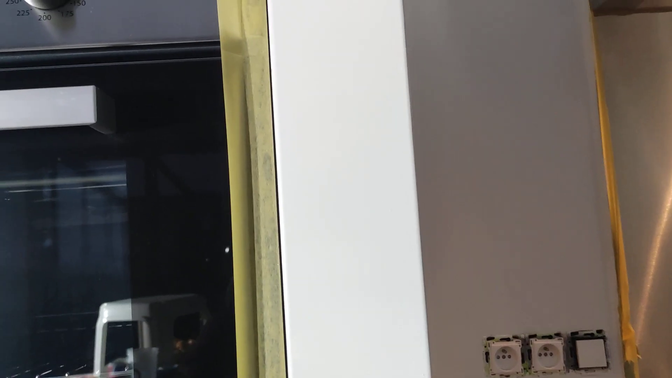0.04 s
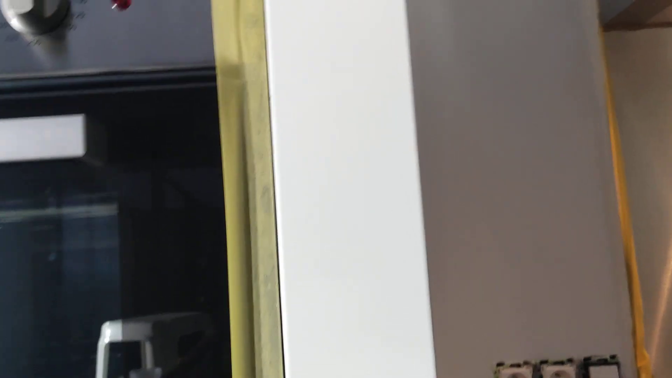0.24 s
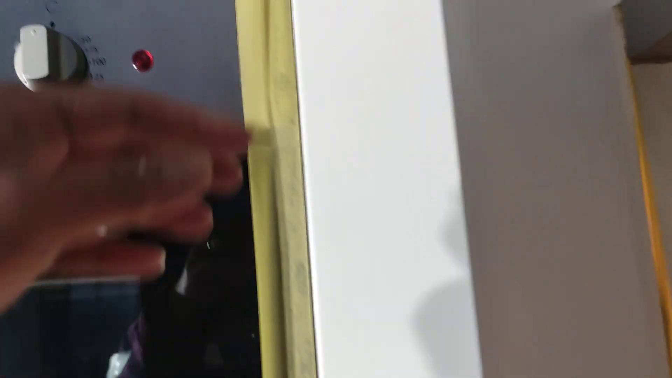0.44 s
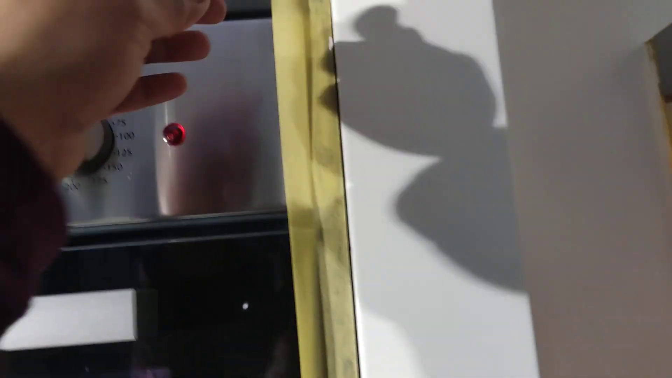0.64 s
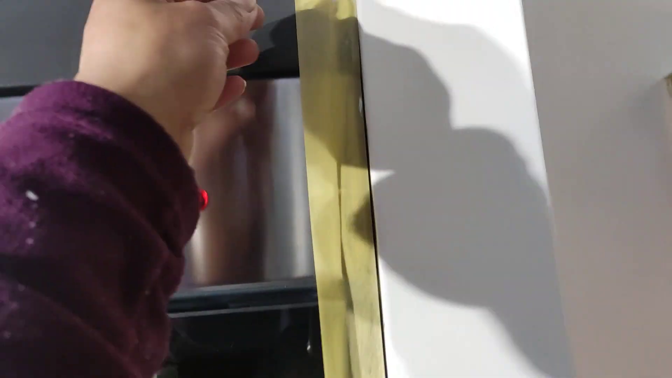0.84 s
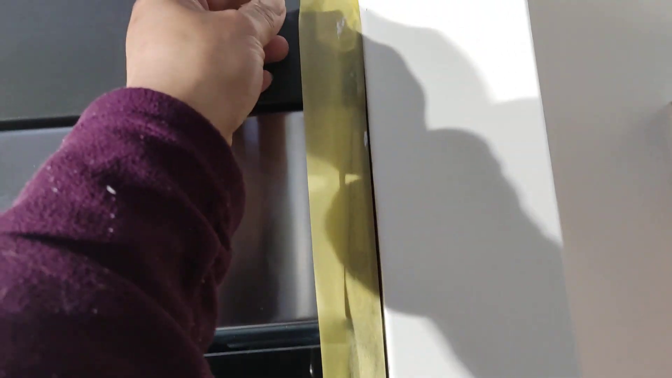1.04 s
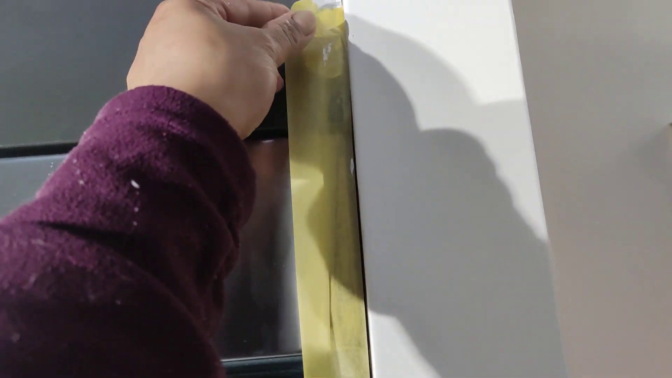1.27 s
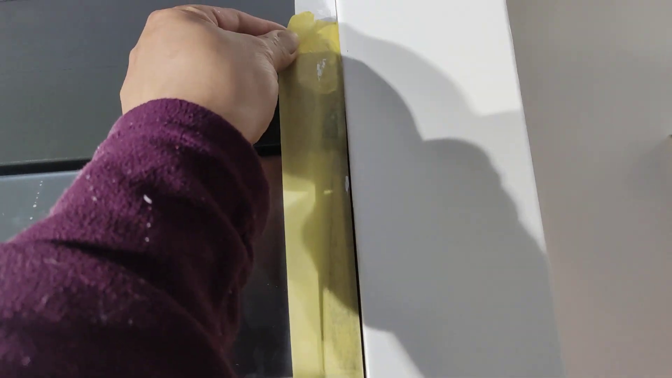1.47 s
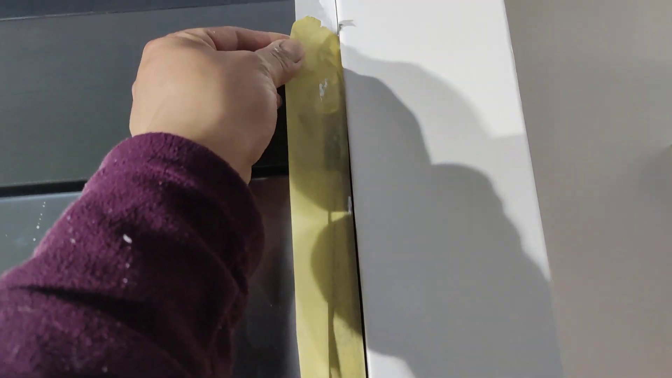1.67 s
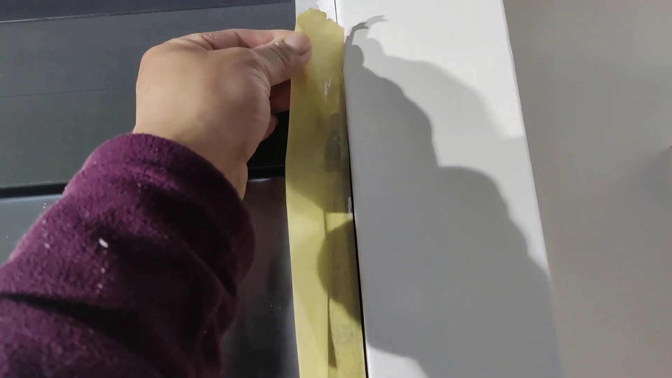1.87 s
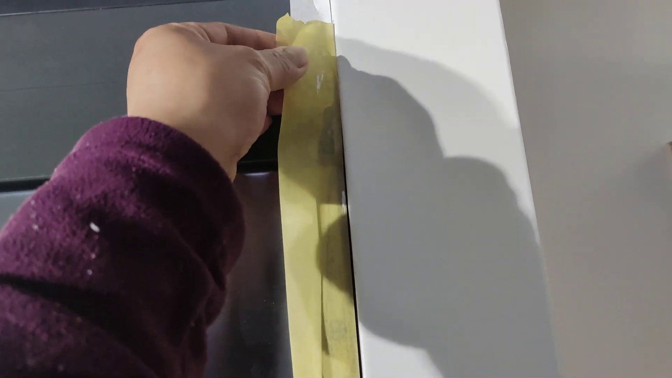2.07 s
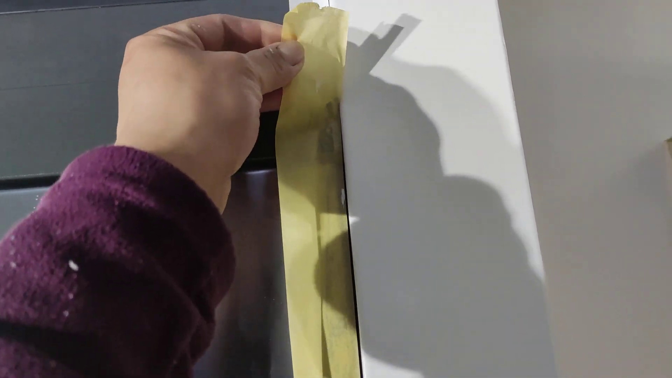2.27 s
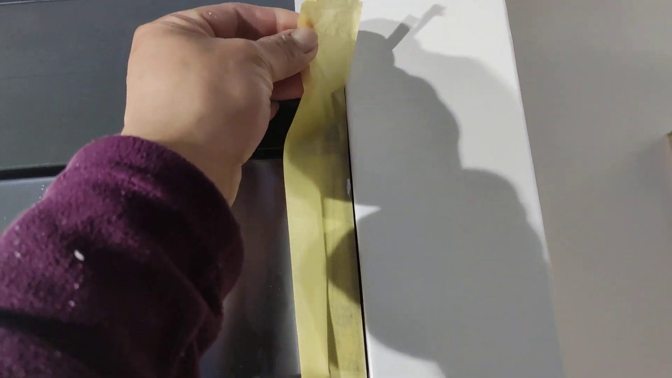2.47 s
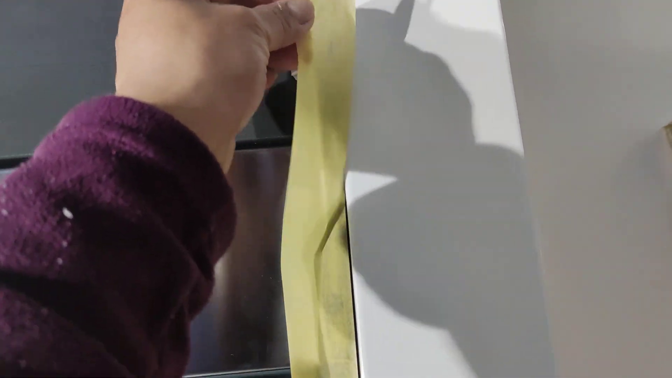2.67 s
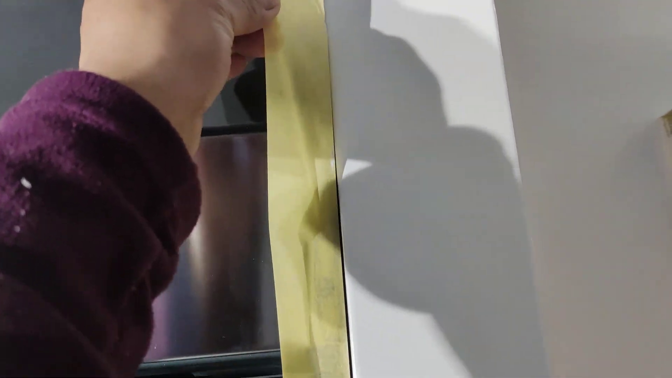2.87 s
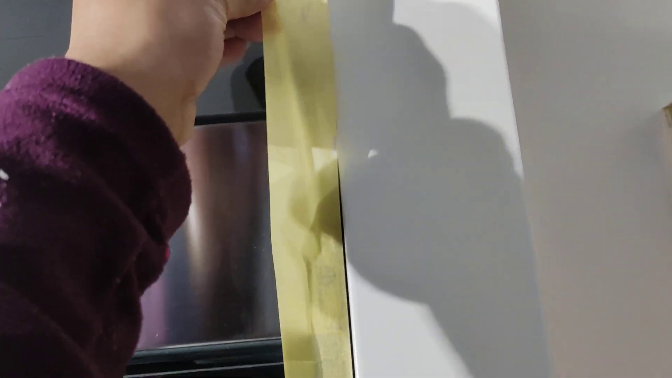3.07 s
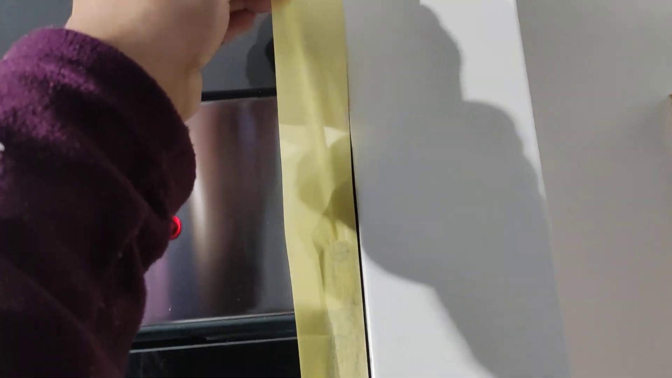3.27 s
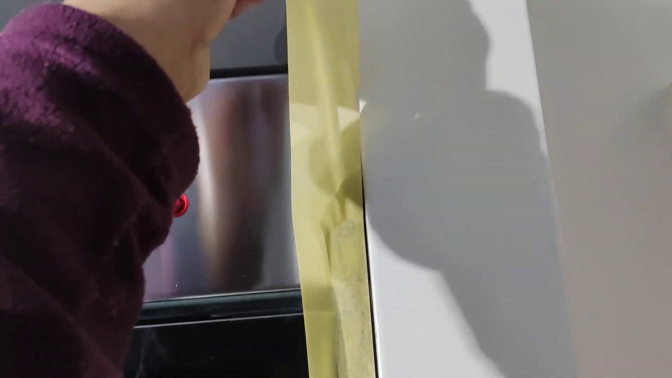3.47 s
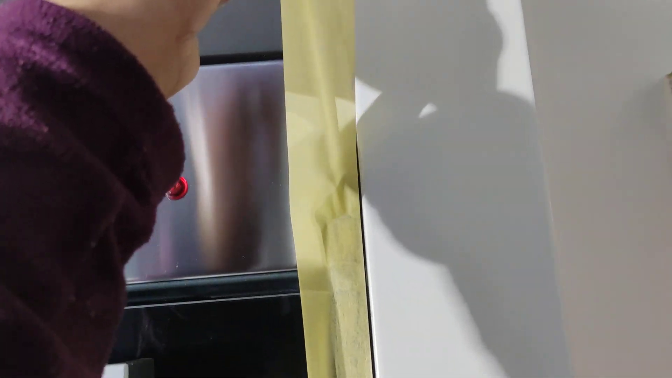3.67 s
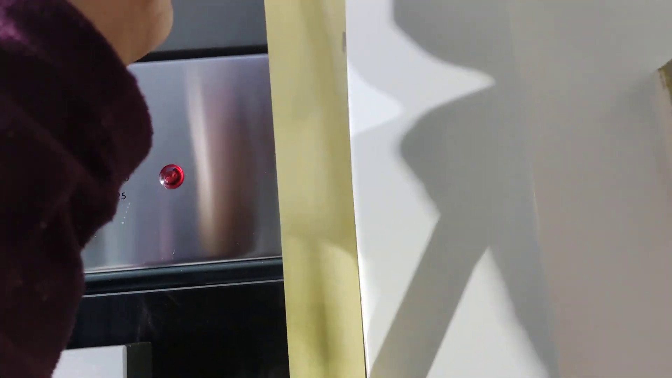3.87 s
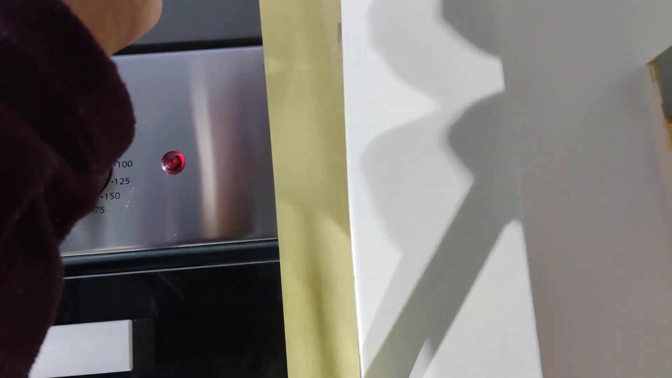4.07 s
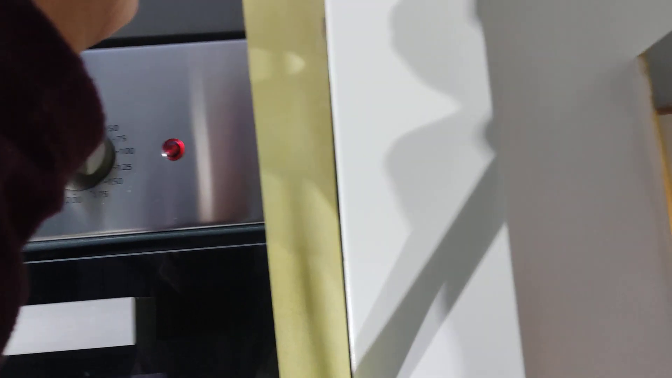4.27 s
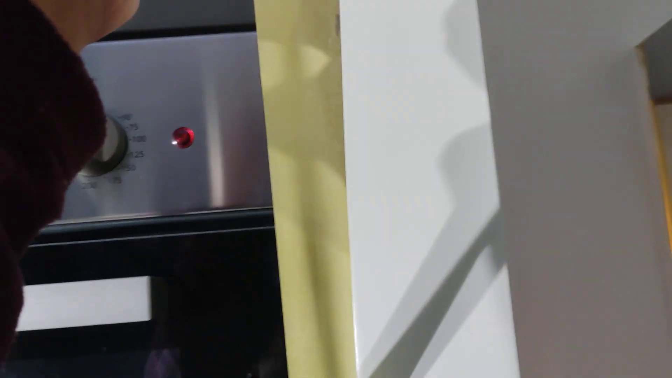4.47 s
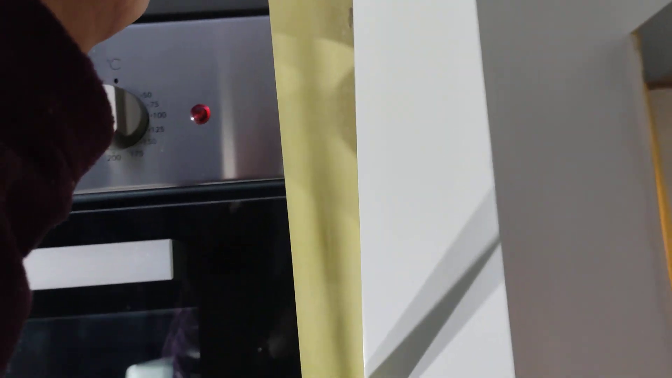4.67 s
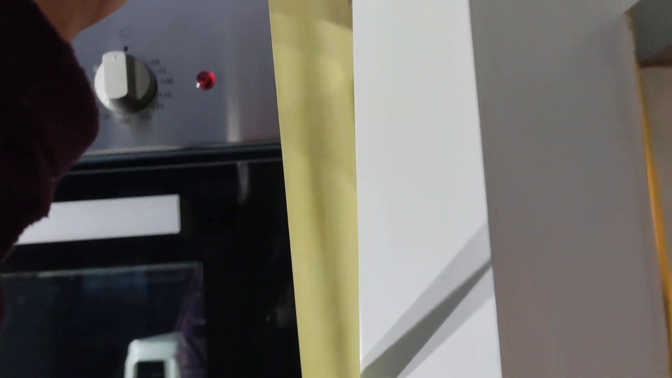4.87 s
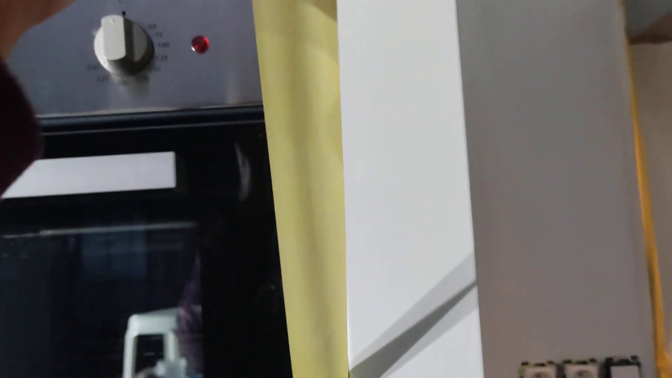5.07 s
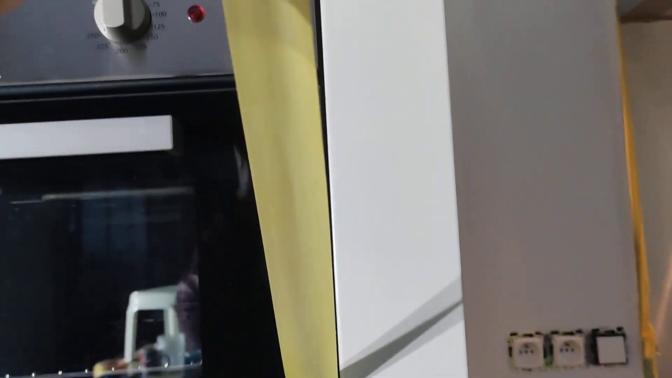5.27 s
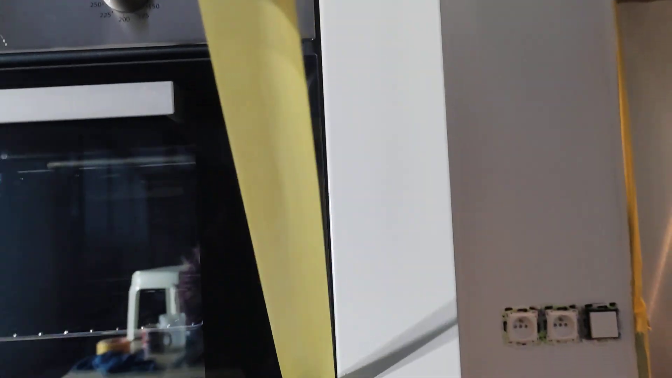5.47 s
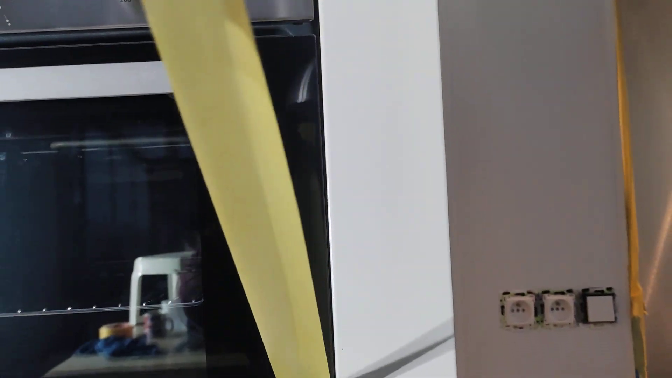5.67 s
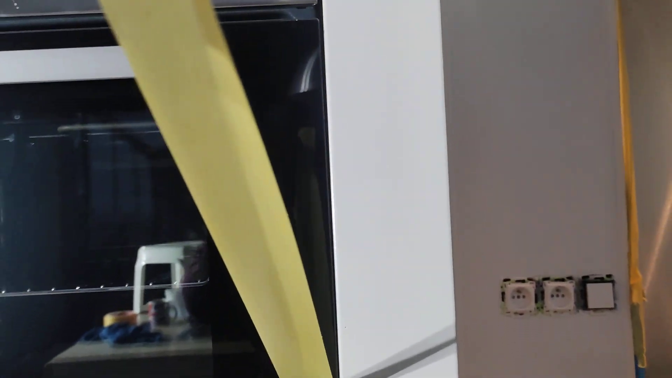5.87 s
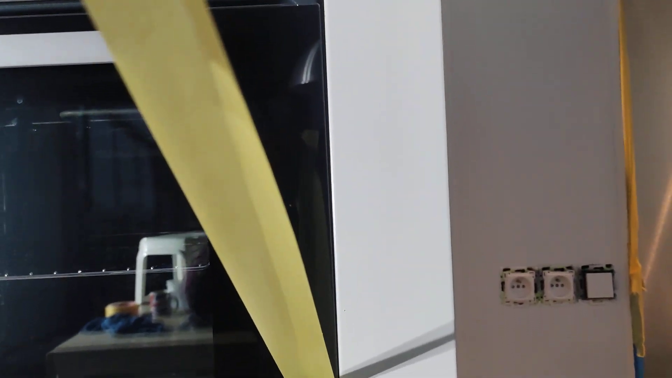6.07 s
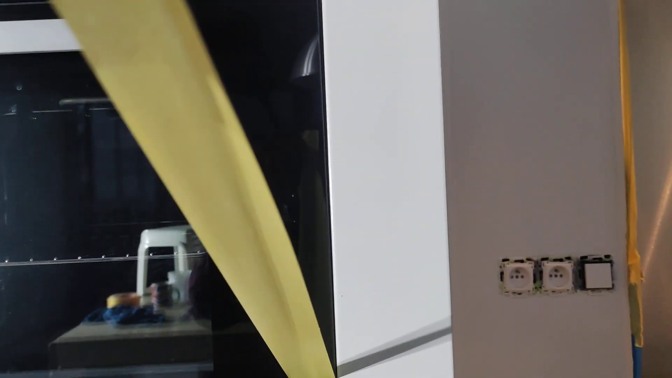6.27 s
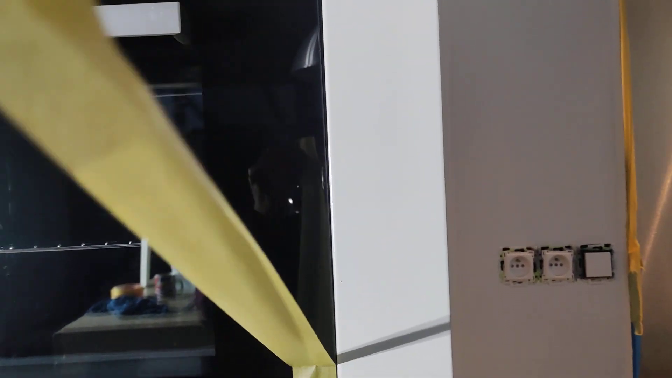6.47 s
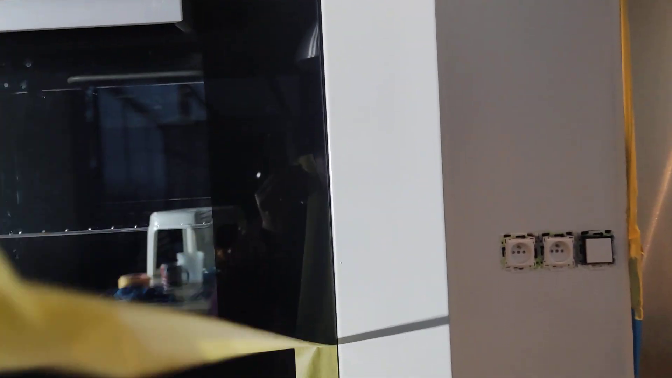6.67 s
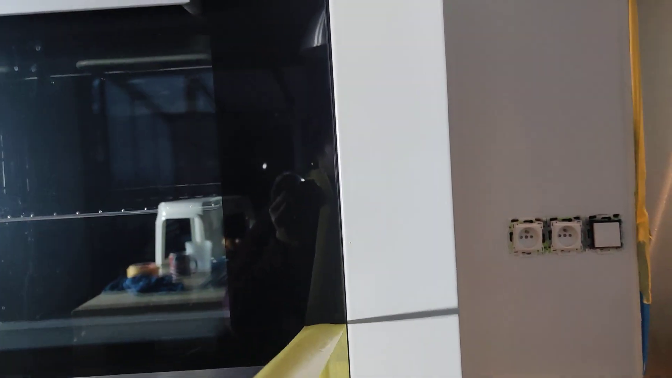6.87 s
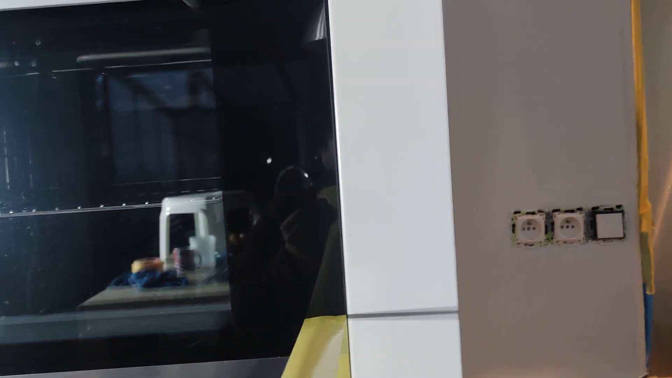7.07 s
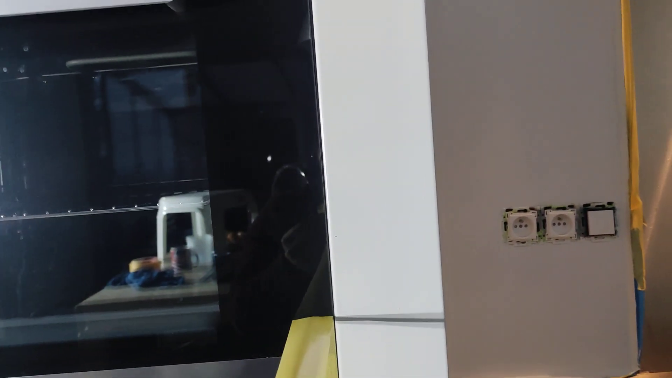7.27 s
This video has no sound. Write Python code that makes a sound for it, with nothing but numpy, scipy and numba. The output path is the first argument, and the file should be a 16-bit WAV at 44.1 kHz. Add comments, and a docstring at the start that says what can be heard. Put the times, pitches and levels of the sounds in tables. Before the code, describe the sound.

Something hard clacks across a bare kitchen, followed by light knocks and a faint sleeve swish. Then masking tape is peeled off a painted panel in a series of short tugs, with fine crackle, sharp snaps, papery pops and a few hard rips. The freed strip rasps and drums as it grows taut, and finally gives a few soft ticks. The microphone is about an arm's length away, and the room rings.

```python
"""Masking tape peels off a painted kitchen panel beside an oven, an arm's length from a phone.
With each tug the glue lets go in a fine crackle, single snaps and a few hard rips; the paper pops,
the panel rings, and the freed strip rasps and drums once long and taut. Before it: a far clack,
light knocks, a sleeve swish, a fingertip squeak. After it: ticks of the slack strip.
A bare room rings; the phone's limiter ducks on the loudest bursts."""
import sys
import numpy as np
from scipy import signal
from scipy.fft import rfft, irfft
from scipy.io import wavfile
from scipy.ndimage import uniform_filter1d, minimum_filter1d, map_coordinates
from numba import njit

SR = 44100
rng = np.random.default_rng(int(sys.argv[2]) if len(sys.argv) > 2 else 0)


def master_out(mix):
    """Clip the mix to full scale and print it as 16-bit PCM to the path in sys.argv[1]."""
    frames = np.transpose(np.atleast_2d(mix))
    ceiling = np.clip(frames, -1, 1)
    pcm = np.round(ceiling * 32767).astype(np.int16)
    wavfile.write(sys.argv[1], SR, pcm)


N = 323253
TIME = np.arange(N) / SR
TOP_HZ = 15900

# room noise spectrum: (frequency [Hz], gain [dB])
FLOOR_SPECTRUM = [(22, -5), (70, -13.5), (100, -16), (330, -15.5), (600, -22.5), (1400, -25), (3500, -28.5),
                  (6000, -28.5), (7500, -24), (9500, -31), (16000, -36.5)]
# far blow spectrum: (frequency [Hz], gain [dB])
CLACK_SPECTRUM = [(300, -12), (1800, -4.5), (2200, 0.5), (3200, 5.5), (6000, 3), (7600, 7.5), (10000, 1),
                  (16000, -12)]
# far object resonances: (frequency [Hz], width [Hz], gain [dB])
CLACK_MODES = [(2200, 21, 6), (3220, 49, -6)]
# knocks of hand, tape and panel: (time [s], peak [dB], frequency [Hz], width [Hz])
KNOCKS = [(0.304, -50, 427, 150), (.348, -40, 270, 258), (.351, -48, 1200, 1600), (3.81, -36, 42, 54),
          (3.837, -30, 300, 280.8), (3.870, -29.5, 52, 200), (4.789, -35.5, 377, 129),
          (4.817, -35, 382, 90)]
# slack strip ticks: (time [s], peak [dB])
TICKS = [(7.157, -38.5), (7.195, -32.5), (7.268, -33)]
# hand tugs: (start [s], end [s], crackle level [dB])
TUGS = [(1.631, 1.898, -39.5), (2.108, 2.26, -51), (2.43, 2.577, -44), (2.626, 2.76, -37),
        (2.815, 2.96, -40.5), (3.153, 3.302, -45), (3.489, 3.627, -54), (3.621, 3.804, -46.5),
        (4.31, 4.458, -47.5), (4.443, 4.541, -36), (4.622, 4.784, -42), (4.815, 4.904, -38),
        (4.984, 5.128, -39.5), (5.138, 5.252, -34), (5.343, 5.422, -42), (5.433, 5.547, -35),
        (5.556, 5.612, -32), (5.745, 5.842, -41), (5.975, 6.16, -57)]
# crackle spectrum: (frequency [Hz], gain [dB])
PEEL_SPECTRUM = [(60, -29), (200, -13), (1200, -20.5), (2400, -17), (4000, -11.5), (5500, -6), (7500, -3),
                 (10000, -10.5), (13000, -15.5), (16000, -20)]
# single glue snaps: (time [s], crack level [dB], crack pitch [Hz], paper pop level [dB])
SNAPS = [(1.655, -20, 8350, -30.5), (1.7225, -18.5, 7400, -29), (1.7399, -18, 8850, -25),
         (1.7765, -17, 6500, -28), (1.78, -21, 8500, -49.5), (1.854, -28.5, 5970, -33.5),
         (1.892, -25, 5800, -38.5), (1.926, -24, 7600, -34), (2.06, -36, 3970, -39),
         (2.135, -35, 4030, -37), (2.17, -32, 3940, -44), (2.205, -21, 8480, -32.5),
         (2.2511, -38.5, 1700, -33.5), (2.281, -14, 3500, -25.5), (2.334, -26, 7500, -64),
         (2.517, -28, 8350, -38), (2.714, -21, 6050, -22), (2.7345, -30.5, 7500, -22.5),
         (2.883, -20, 12100, -29.5), (2.9118, -31, 7500, -40), (2.9517, -19.5, 8600, -46),
         (3.0183, -14.5, 7500, -40.5), (3.0806, -12.5, 7500, -44), (3.0899, -18, 8250, -48),
         (3.1144, -10, 7500, -39.5), (3.499, -33.5, 7160, -52), (3.684, -26.5, 7400, -46.5),
         (3.765, -27.5, 7500, -42), (3.8572, -4, 9600, -20.5), (3.8622, -6, 9700, -29.5),
         (4.4471, -14.5, 7800, -34), (4.667, -29.5, 7500, -43.5), (4.717, -26.5, 8950, -54),
         (4.77, -12, 5860, -25.5), (4.7901, -17.5, 6440, -51), (4.817, -6, 7500, -30)]
# snap spectrum: (frequency [Hz], gain [dB])
SNAP_SPECTRUM = [(100, -17), (700, -5), (2200, -3), (4000, 0), (5600, -1.5), (7500, 1.5), (10000, -5.5),
                 (16000, -9)]
# stretches letting go at once: (time [s], length [s], rms [dB], flap ring [Hz], panel push [dB])
RIPS = [(2.698, 0.0032, -9, 6510, -1), (2.724, 0.0079, -11.5, 7500, -26),
        (3.075, 0.0064, -26.5, 7800, -14.5), (3.805, 0.014, -10, 7500, 3.5), (3.832, 0.025, -9, 8900, -4),
        (3.8682, 0.0071, -5, 4706, -2), (4.4446, 0.0016, -5.5, 8340, -8.5), (4.786, .011, -23, 5400, -18),
        (5.111, 0.015, -28, 7500, -26.5), (5.19, 0.0095, -31.5, 6800, -16.5),
        (5.229, 0.012, -30, 5930, -21.5), (5.567, 0.0079, -27, 7500, -9.5)]
# rip spectrum: (frequency [Hz], gain [dB])
RIP_SPECTRUM = [(40, -7.5), (200, 5.5), (700, 3.5), (1300, -3.5), (2200, -6), (4000, -5), (5600, -1.5),
                (7600, 0.5), (10000, -6), (16000, -7.5)]
# panel resonances: (frequency [Hz], width [Hz], gain [dB])
PANEL_MODES = [(235.4, 3.2, 4), (282.5, 7.5, 2.5), (691, 5, 12.5), (894, 9, -2)]
# taut strip resonances: (frequency [Hz], width [Hz], gain [dB])
STRIP_MODES = [(150, 20, -4.5), (272, 45, -1.5), (345, 27, 8.5), (533, 17, 1), (755, 20, -3), (950, 57, -1)]
# kitchen reverberation: (frequency [Hz], t60 [s], level [dB])
REVERB_BANDS = [(200, 1.32, -7.5), (701, 2.1, -7), (1523, 1.24, -7.5), (3520, 1.305, -8.5),
                (7500, 0.99, -8.5), (10500, 0.79, -10.5), (16000, 0.7, -13)]
# peel line position at the mic ports: (time [s], left lag [samples], left minus right [dB])
PEEL_PATH = [(1.599, 3.58, 1), (2.7, 4.57, 5), (3.85, 3.7, 2), (4.45, 3.95, -4.5), (4.8, 4, 0), (5.3, 4, 0),
             (5.8, 13.5, -2.5)]
# right port response against left: (frequency [Hz], gain [dB])
RIGHT_PORT = [(100, 3), (700, .5), (2400, 2), (4400, 1.5), (8000, 2), (15000, 5.5)]


def undb(db):
    """Decibels to gain."""
    return 10 ** (np.asarray(db) / 20)


def unit(x):
    """Scale to rms 1."""
    return x / np.sqrt(np.mean(x ** 2))


def peak(x, db):
    """Scale to a peak level."""
    return x * undb(db) / np.abs(x).max()


def burst(x, db, window_s=0.001):
    """Scale to the energy of window_s at rms level db."""
    return x * undb(db) * np.sqrt(window_s * SR) / np.linalg.norm(x)


def add(track, s, sound):
    """Mix in at time s."""
    i = int(s * SR)
    track[i:i + len(sound)] += sound[:N - i]


def on_log_axis(hz, points):
    """Interpolate (Hz, value) points over log frequency."""
    f, value = np.transpose(points)
    return np.interp(np.log(np.maximum(hz, 1)), np.log(f), value)


def colour(x, spectrum, size=2048):
    """Minimum-phase filter from (Hz, dB) points."""
    cepstrum = irfft(on_log_axis(np.fft.rfftfreq(size, 1 / SR), spectrum) * np.log(10) / 20)
    cepstrum[1:size // 2] *= 2
    cepstrum[size // 2 + 1:] = 0
    response = irfft(np.exp(rfft(cepstrum)))
    return signal.fftconvolve(x, response)[:len(x)]


def whiten(x):
    """Flatten the spectrum, keep the phase."""
    phase = np.angle(rfft(x, 2 * len(x)))
    return irfft(np.exp(1j * phase))[:len(x)]


def ring(x, hz, width_hz):
    """Resonance, gain 1 at centre."""
    w = 2 * np.pi * min(hz, TOP_HZ) / SR
    a = np.sin(w) * width_hz / hz / 2
    return signal.lfilter([a, 0, -a], [1 + a, -2 * np.cos(w), 1 - a], x)


@njit
def moving_ring(x, hz, width_hz):
    """Resonance with a moving centre, gain 1 there."""
    y, band, low = np.empty(len(x)), 0., 0.
    for i in range(len(x)):
        g, k = np.tan(np.pi * hz[i] / SR), width_hz / hz[i]
        v = (band + g * (x[i] + 1e-18 - low)) / (1 + g * (g + k))
        band, low, y[i] = 2 * v - band, low + 2 * g * v, k * v
    return y


def steep_ring(x, hz, width_hz, stage=ring):
    """Two resonances in series, the second twice as wide."""
    return stage(stage(x, hz, width_hz), hz, 2 * width_hz)


def wander(per_s):
    """Random drift, spread near 1."""
    knots_s = np.arange(0, TIME[-1] + 1, 1 / per_s)
    return np.interp(TIME, knots_s, rng.standard_normal(len(knots_s)))


def impulses(per_s, scatter_db, size=N):
    """Random impulses of unequal strength, as of glue threads breaking."""
    hits = rng.random(size) < per_s / SR
    strength = undb(scatter_db * np.minimum(rng.standard_normal(size), 2))
    return hits * strength * rng.choice([-1, 1], size)


def crack(tail, fade_s, size=2048):
    """Impulse with a fading noise tail, whitened."""
    x = tail * rng.standard_normal(size) * np.exp(-TIME[:size] / fade_s)
    x[0] = 1
    return whiten(x)


def noise_floor(level_db=-60, rumble_hz=600, waver_db=1.5):
    """Room rumble common to both ports, plus each port's own hiss."""
    rumble = signal.sosfilt(signal.butter(2, rumble_hz, fs=SR, output="sos"), rng.standard_normal(N))
    rumble *= undb(waver_db * wander(7.3))
    ports = [rng.standard_normal(N) + rumble for _ in range(2)]
    return np.array([unit(colour(x, FLOOR_SPECTRUM)) for x in ports]) * undb(level_db)


def far_clack(time_s=0.177, blow_db=-4, ring_db=-43):
    """A hard object clacks across the room: its ring arrives direct, the blow only as reverberation."""
    direct, far = np.zeros(N), np.zeros(N)
    blow = colour(crack(tail=0.03, fade_s=0.022, size=8192), CLACK_SPECTRUM)
    modes = sum(undb(db) * ring(blow, hz, width_hz) for hz, width_hz, db in CLACK_MODES)
    add(direct, time_s, peak(modes, ring_db))
    add(far, time_s, peak(blow, blow_db))
    return direct, far


def handling():
    """Hand, tape and panel knock; the loose strip ticks as it sags."""
    out = np.zeros(N)
    for s, db, hz, width_hz in KNOCKS:
        blow = crack(tail=0.096, fade_s=0.017, size=8192)
        add(out, s, peak(steep_ring(blow, hz, width_hz), db))
    for s, db in TICKS:
        tick = crack(tail=0.89, fade_s=0.0014)
        body = ring(tick, hz=700, width_hz=2200)
        crisp = ring(colour(tick, SNAP_SPECTRUM), hz=4600, width_hz=1800)
        add(out, s, peak(body + crisp, db))
    return out


def sleeve(centre_s=0.58, width_s=0.26, level_db=-68):
    """The sleeve swishes as the arm comes up."""
    swell = np.exp(-((TIME - centre_s) / width_s) ** 2)
    return unit(colour(rng.standard_normal(N), PEEL_SPECTRUM)) * swell * undb(level_db)


def fingers(pull, squeak_s=(1.17, 1.38, 1.5), squeak_db=(-81.5, -72, -82), pinch_end_s=2.6):
    """A fingertip squeaks, feeling for the tape end; the paper crumples with each tug while pinched."""
    squeak = steep_ring(impulses(400, 1.7), hz=2020, width_hz=70)
    rustle = steep_ring(impulses(500, 7.9), hz=1200, width_hz=2200)
    touching = (TIME > squeak_s[0]) * (TIME < squeak_s[-1])
    rub = uniform_filter1d(undb(np.interp(TIME, squeak_s, squeak_db)) * touching, size=512)
    pinch = undb(-31) * pull ** 0.54 * (TIME < pinch_end_s)
    return unit(squeak) * rub + unit(rustle) * pinch


def tugs(attack_s=0.045, release_s=0.051):
    """Peel envelope: each tug builds, holds, dies away."""
    out = np.zeros(N)
    for start_s, end_s, db in TUGS:
        attack = np.clip((TIME - start_s) / attack_s, 0, 1)
        release = np.exp(-np.maximum(TIME - end_s, 0) / release_s)
        out += undb(db) * attack * release
    return out


def stick_slip(jumps_per_s, scatter_db, size=N):
    """Stepped gain: the peel line catches and jumps on the crepe ridges."""
    step = np.cumsum(rng.random(size) < jumps_per_s / SR)
    return undb(scatter_db * np.clip(rng.standard_normal(size), -2, 1.6))[step]


def tautness(start_s=4.57, tighten_s=0.175):
    """0 to 1 as the freed strip grows long and tight."""
    return np.clip((TIME - start_s) / tighten_s, 0, 1)


def crackle(slip, pull, gain_db=-0.5, taut_db=-4, stout_db=-9.5):
    """Fine glue threads break, softer once the strip is taut; stout ones tick brightly."""
    fine = unit(colour(impulses(2200, 6.5) * slip, PEEL_SPECTRUM))
    stout = unit(colour(impulses(55, 2.1), SNAP_SPECTRUM))
    return (fine * undb(gain_db + taut_db * tautness()) + stout * undb(stout_db)) * pull


def snaps(pop_hz=1500, pop_gain_db=-1):
    """Glue cracks sharply; the paper buckles with a dry pop of random pitch."""
    out = np.zeros(N)
    for s, crack_db, crack_hz, pop_db in SNAPS:
        snap = crack(tail=0.78, fade_s=0.0003)
        hz = pop_hz * np.exp(0.35 * rng.standard_normal())
        pop = steep_ring(snap, hz, width_hz=1.2 * hz)
        sharp = ring(colour(snap, SNAP_SPECTRUM), crack_hz, width_hz=0.71 * crack_hz)
        add(out, s, burst(sharp, crack_db) + burst(pop, pop_db + pop_gain_db))
    return out


def rips(rise_s=0.0026, fade_s=0.0021, size=4096):
    """An avalanche of breaks rings the free flap: dense in a hard rip, a sputter in a light one."""
    out, t = np.zeros(N), TIME[:size]
    for s, length_s, db, flap_hz, _ in RIPS:
        envelope = np.minimum(t / rise_s, 1) * np.exp(-np.maximum(t - length_s, 0) / fade_s)
        jerks = stick_slip(jumps_per_s=900, scatter_db=3, size=size)
        breaks = whiten(impulses(40000 * undb(db), 1.5, size) * envelope * jerks)
        flap = colour(ring(breaks, flap_hz, width_hz=0.92 * flap_hz), RIP_SPECTRUM)
        add(out, s, undb(db) * flap * np.linalg.norm(envelope) / np.linalg.norm(flap))
    return out


def panel(gain_db=10):
    """Each rip pushes the panel; its modes ring faintly."""
    pushes = np.zeros(N)
    for s, *_, push_db in RIPS:
        add(pushes, s, undb([push_db]))
    return sum(undb(db + gain_db) * ring(pushes, hz, width_hz) for hz, width_hz, db in PANEL_MODES)


def strip_rasp(slip, pull, hz=7000, width_hz=2600, level_db=-37):
    """The taut strip turns crackle into a rasp that drifts in pitch and surges on hard tugs."""
    centre_hz = hz * np.exp(0.027 * wander(13))
    rasp = steep_ring(impulses(2600, 4.5) * slip, centre_hz, width_hz, stage=moving_ring)
    surge = (pull / pull.max()) ** 1.17
    return unit(rasp) * tautness() * surge * undb(level_db)


def strip_drum(slip, pull, gain_db=-16.5):
    """Slips pluck the taut strip; its pitch wavers with tension."""
    plucks = impulses(500, 4.7) * slip
    detune = np.exp(0.024 * wander(9.5))
    body = sum(undb(db) * moving_ring(plucks, hz * detune, width_hz) for hz, width_hz, db in STRIP_MODES)
    return unit(body) * tautness() * pull * undb(gain_db)


def reverb_tail(build_s=0.00037, size=65536):
    """Diffuse room response, one decay per band."""
    t, hz = TIME[:size], np.fft.rfftfreq(size, 1 / SR)
    noise, out = rfft(rng.standard_normal(size)), 0
    for centre_hz, t60_s, db in REVERB_BANDS:
        band = on_log_axis(hz, [(f, f == centre_hz) for f, *_ in REVERB_BANDS])
        fade = np.exp(-np.log(1000) * t / t60_s) * (1 - np.exp(-t / build_s))
        out += undb(db) * irfft(noise * band) * fade / np.linalg.norm(fade)
    return out


def near_echoes(level_db=-6, fade_s=0.0084, gap_s=0.0004, size=4096):
    """Early reflections off oven front, arm and cupboard."""
    t = TIME[:size]
    echoes = impulses(4000, 8.8, size) * np.exp(-t / fade_s) * (t > gap_s)
    return undb(level_db) * echoes / np.linalg.norm(echoes)


def kitchen(near, far, segments=6):
    """Room sound at one port; a new echo pattern per segment as hand and phone move."""
    out = np.zeros(N)
    for part in np.array_split(np.arange(N), segments):
        add(out, TIME[part[0]], signal.fftconvolve(near[part] + far[part], reverb_tail()))
        add(out, TIME[part[0]], signal.fftconvolve(near[part], near_echoes()))
    return out


def at_ports(x, jitter_samples=1):
    """Direct path: the left port lags; the lag jitters as breaks dart across the tape."""
    times_s, *columns = np.transpose(PEEL_PATH)
    lag_samples, pan_db = (np.interp(TIME, times_s, column) for column in columns)
    late = map_coordinates(x, [np.arange(N) - lag_samples - jitter_samples * wander(150)], order=3)
    return np.array([late * undb(pan_db / 2), x * undb(-pan_db / 2)])


def limiter(x, ceiling_db=-9, hold_s=0.099, ramp_s=0.0033, sense_s=0.0013):
    """Ducks just ahead of a loud burst, holds, releases fast; a lone click slips through."""
    hold, ramp = int(hold_s * SR), int(ramp_s * SR)
    power = uniform_filter1d(x ** 2, int(sense_s * SR)).max(axis=0)
    gain = np.minimum(1, undb(ceiling_db) / np.sqrt(np.maximum(power, 1e-9)))
    held = minimum_filter1d(gain, hold, origin=(hold - 1) // 2)
    return x * uniform_filter1d(minimum_filter1d(held, ramp), ramp)


def scene():
    """Tape and panel close by, the room all round, at two mic ports."""
    slip, pull = stick_slip(jumps_per_s=360, scatter_db=-2.5), tugs()
    tape = snaps() + rips() + crackle(slip, pull) + strip_rasp(slip, pull) + strip_drum(slip, pull)
    clack_ring, far_blow = far_clack()
    near = tape + panel() + handling() + fingers(pull) + sleeve() + clack_ring
    room = np.array([kitchen(near, far_blow) for _ in range(2)])
    left, right = at_ports(near) + room + noise_floor()
    return np.array([left, colour(right, RIGHT_PORT)])


def record(dry):
    """Phone: limiter, full-scale clipping, steep low-pass."""
    lowpass = signal.ellip(10, 0.2, 70, TOP_HZ, fs=SR, output="sos")
    return signal.sosfilt(lowpass, np.clip(limiter(dry), -1, 1))


dry = scene()
out = record(dry)
master_out(out)
```